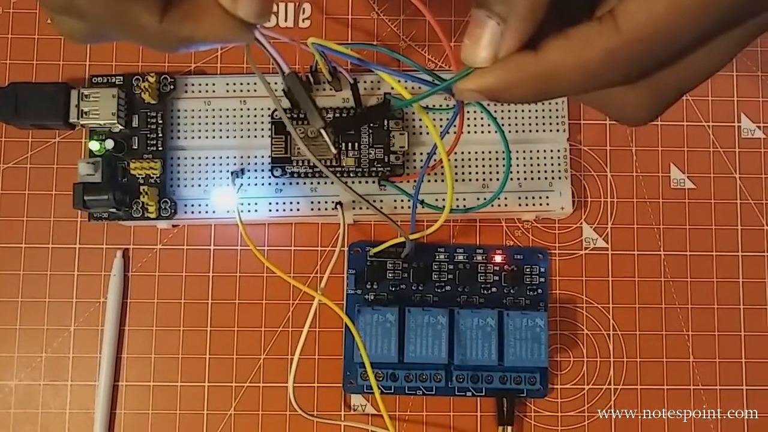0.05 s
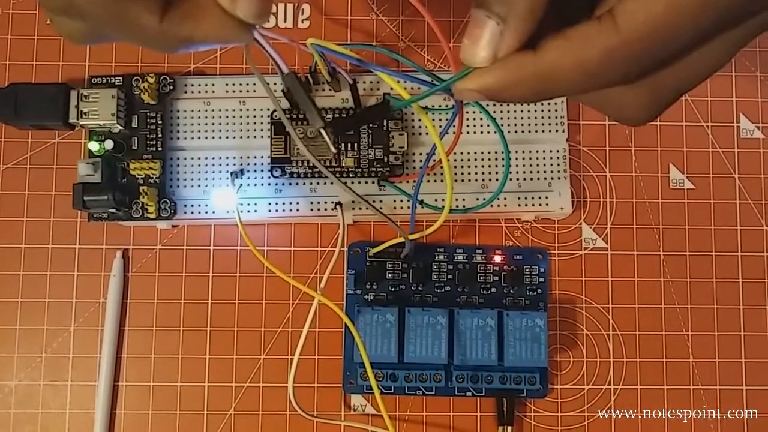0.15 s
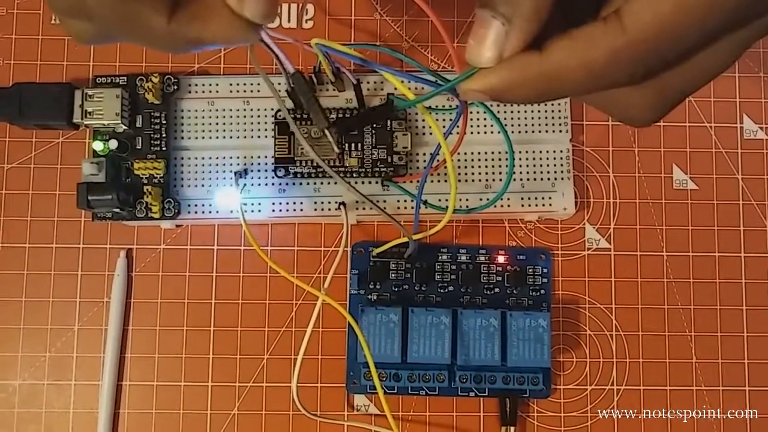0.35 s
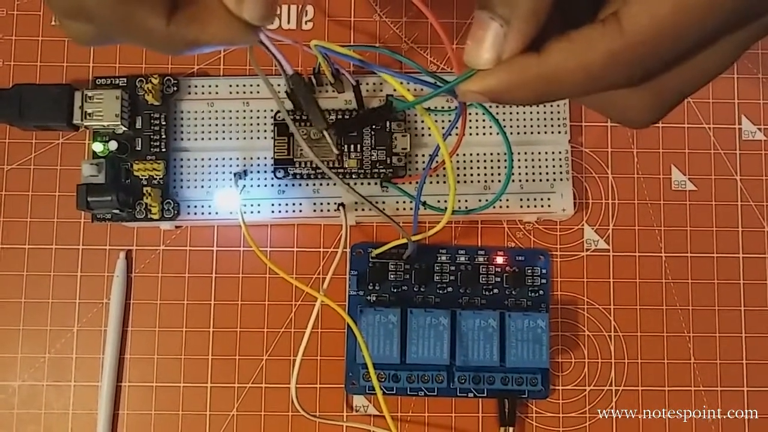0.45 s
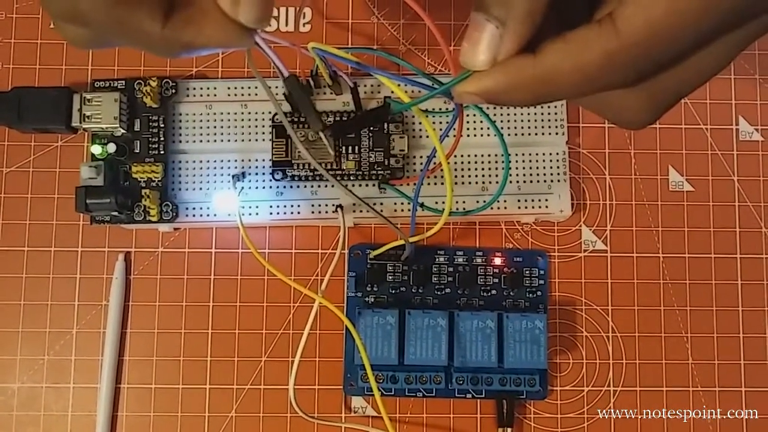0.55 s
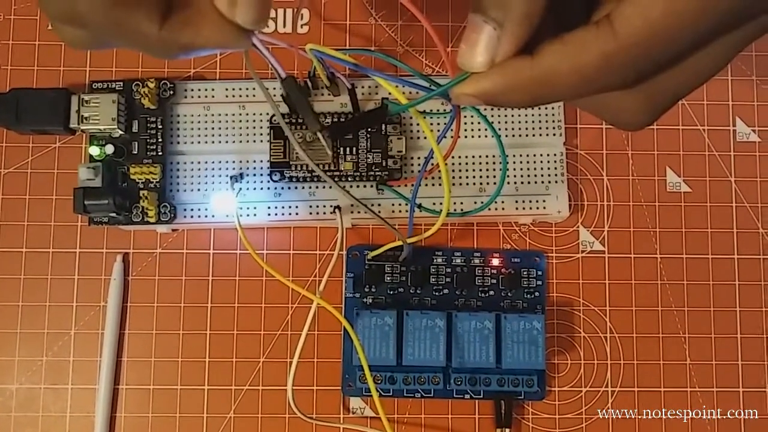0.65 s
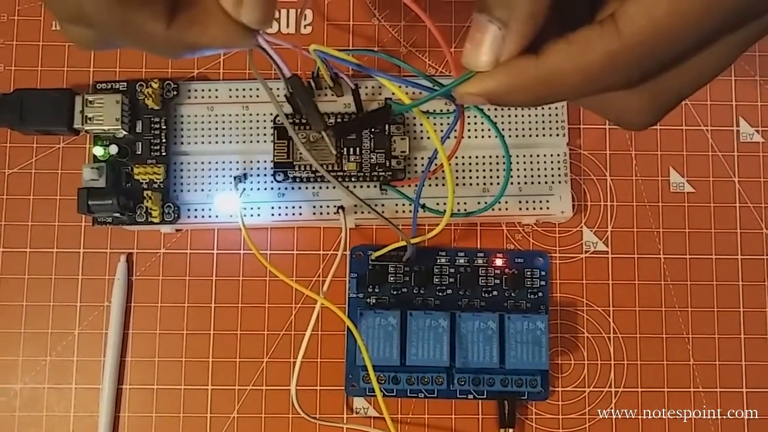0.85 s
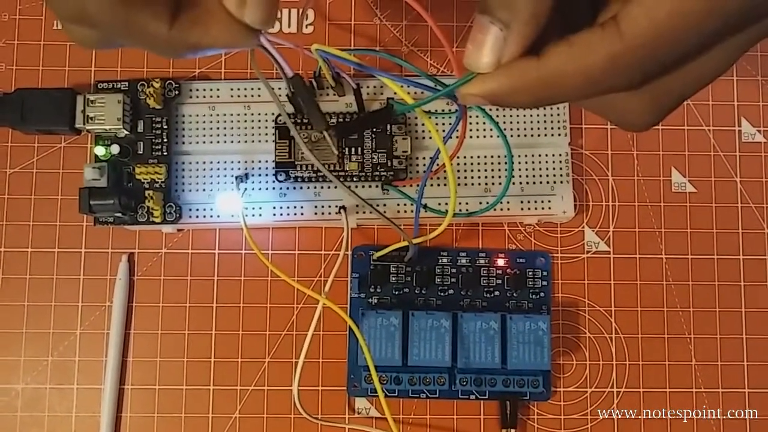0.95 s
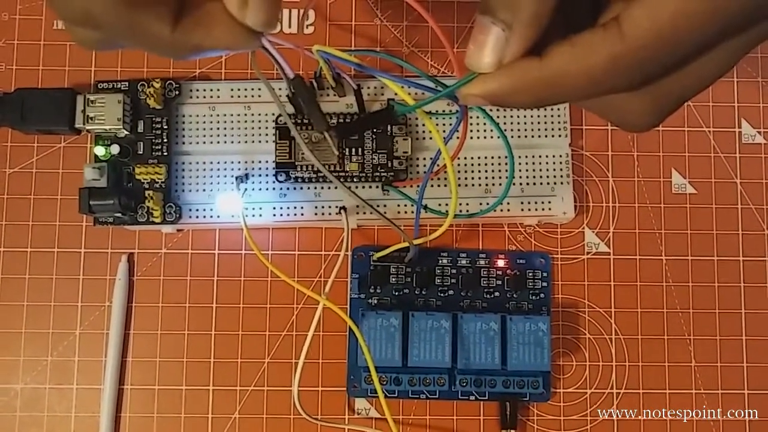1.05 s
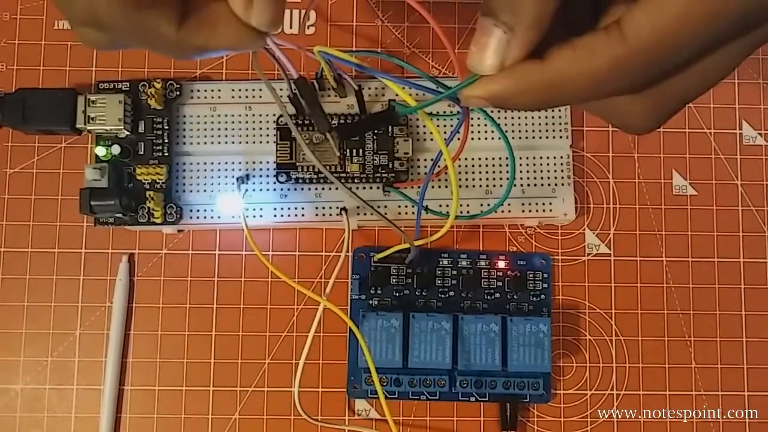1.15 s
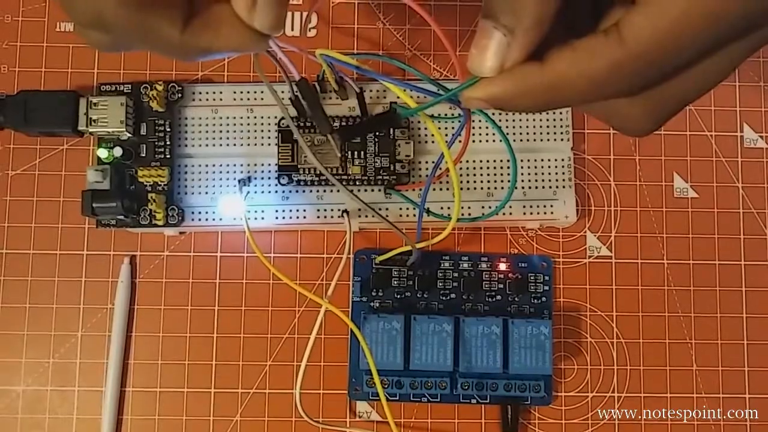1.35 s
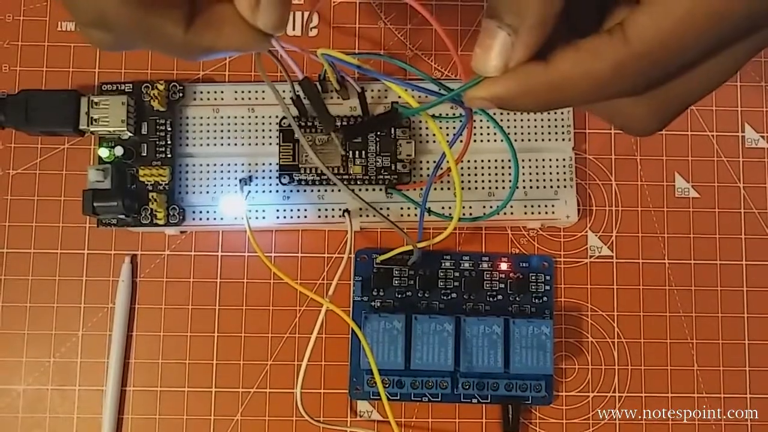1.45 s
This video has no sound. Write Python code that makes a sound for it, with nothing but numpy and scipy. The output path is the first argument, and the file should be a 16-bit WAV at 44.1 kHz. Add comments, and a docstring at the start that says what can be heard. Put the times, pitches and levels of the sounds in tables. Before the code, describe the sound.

A small relay snaps sharply, then chatters in a quick metallic double click, in a small room

```python
"""Chattering relay on a desk, small hard room

Near: a small relay snaps once, then chatters as its armature bounces and rattles before it seats. Blows ring
decaying modes of its metal parts, case and circuit board; filtered noise makes the cracks and the rattle. Amid
the blows the spring quivers, a pitch-jittered sine. Echoes and a dense tail place it in the room. Behind: faint
wavering hum, steady room noise and distant falling chirps, probably a bird (swept sines)."""
import sys
import numpy as np
from scipy import signal
from scipy.fft import rfft, irfft
from scipy.io import wavfile

SR = 44100
rng = np.random.default_rng(int(sys.argv[2]) if len(sys.argv) > 2 else 0)


def materialize(psi):
    """Save the field psi as 16-bit PCM at rate SR to the path in sys.argv[1].

    A 1-D psi becomes a single channel; in a 2-D psi each row is a channel.
    """
    bounded = np.clip(np.atleast_2d(psi).T, -1, 1)
    quanta = np.round(bounded * 32767).astype(np.int16)
    wavfile.write(sys.argv[1], SR, quanta)


N = 66150

# room noise, spectrum before scaling to rms 1: f/Hz, relative level/dB
NOISE_SPECTRUM = [(20, -46), (50, -15.5), (90, -2), (140, -2), (230, 4), (330, 1.5), (480, -3.5),
                  (1200, -7), (1900, -11.5), (3500, -13.5), (6200, -13.5), (8500, -21.5), (11000, -25.5),
                  (15000, -23.5)]
# room noise over time: t/s, level/dB
NOISE_LEVEL = [(0, -55), (.25, -55), (.5, -60), (.6, -56), (.75, -58.5), (1, -57.5), (1.35, -59),
               (1.5, -57.5)]
# hum over time: t/s, level/dB
HUM_SWELL = [(0, -70), (.37, -62.5), (.6, -69.5), (.8, -69.5), (1.02, -59), (1.2, -68), (1.5, -65)]
# distant chirps: t/s, length/s, start f/Hz, end f/Hz, level/dB, octave relative level/dB
CHIRPS = [(.0, 0.032, 4414, 2557, -48.5, -2.5), (0.082, 0.043, 4308, 2937, -51.5, -13),
          (0.308, 0.039, 4207, 2734, -51.5, -1.5), (0.52, 0.067, 4785, 4260, -58.5, -13),
          (0.546, .024, 4188, 2287, -48.5, -5.5), (0.809, 0.025, 4100, 2785, -55.5, -3.5),
          (0.894, 0.025, 4408, 2513, -48, -5.5), (1.08, .026, 4108, 2880, -55, -5.5),
          (1.169, 0.019, 4574, 2680, -49, -5.5), (1.377, 0.027, 4100, 2744, -53.5, -3),
          (1.444, 0.023, 4600, 2453, -49.5, -4.5)]
# tone colour of the chirps and their reverberation: f/Hz, gain/dB
CHIRP_COLOUR = [(2300, -3), (3200, -2), (4200, -0.5), (5000, -7), (5700, 1), (6600, 1), (7100, -8),
                (7800, -11), (9500, -10.5)]
# jolts of the circuit board: t/s, level/dB
BOARD_JOLTS = [(.2126, -32.5), (.2727, -33.5), (.2815, -34.5), (.2855, -40), (.2888, -38), (.2930, -43)]
# armature blows: t/s, then the level/dB of case, armature, yoke, spring and crack
BLOWS = [(0.2143, -12, -18, -21.5, -11.5, -26), (0.276, -24.5, -11.5, -26.5, -39, -38),
         (0.2774, -8.5, -7.5, -37, -19.5, -44), (0.2803, -21, -33, -26.5, -21.5, -60),
         (0.2924, -20, -28, -35, -32, -29), (0.2936, -9, -13, -22, -12, -26.5)]
# modes of the circuit board: f/Hz, relative level/dB
BOARD_MODES = [(930, -18), (1080, -1), (1220, -0.5), (2450, -8)]
# modes of the armature: f/Hz, relative level/dB
ARMATURE_MODES = [(6760, 1), (6980, -11)]
# modes of the case: f/Hz, relative level/dB
CASE_MODES = [(5520, -9), (5790, 2), (6110, 1.5), (11620, -18), (12520, -20), (13500, -23), (14300, -35)]
# modes of the metal yoke: f/Hz, relative level/dB
YOKE_MODES = [(7750, 0.5), (8090, 3.5), (8600, -11), (9600, -12.5)]
# modes of the contact spring: f/Hz, relative level/dB
SPRING_MODES = [(4130, -11.5), (4500, 3), (4730, 0.5)]
# crack of a blow, spectrum before scaling to rms 1: f/Hz, relative level/dB
CRACK_SPECTRUM = [(30, -37), (120, -38), (400, -16), (1200, -14), (1900, -26), (2600, -5), (3400, -17.5),
                  (4300, 8.5), (6500, 3), (8500, -4), (10300, -7), (12800, -9.5), (15000, -10.5)]
# fine rattle, spectrum before scaling to rms 1: f/Hz, relative level/dB
RATTLE_SPECTRUM = [(40, -12.5), (100, -7), (300, -0.5), (600, -7.5), (1150, 3), (1700, -9), (2700, -3.5),
                   (3400, -5), (4500, 3), (6500, 0.5), (8200, 1), (9800, -17), (12000, -3.5), (13600, -10),
                   (15000, -24)]
# quivers of the contact spring: t/s, length/s, f/Hz, level/dB
SPRING_QUIVERS = [(0.2743, 0.0049, 4610, -26.5), (.2820, .0050, 4510, -23), (0.2858, 0.0068, 4410, -20.5)]
# early reflections of the relay: delay t/s, level/dB
ECHOES = [(.00105, -18.5), (0.012, -29), (0.0142, -19), (0.0152, -27), (0.021, -25)]
# reverberation time of the room, 60 dB decay: f/Hz, T60/s
ROOM_T60 = [(200, 1), (1300, 0.48), (3500, 0.55), (6000, 0.4), (9000, 0.39), (15000, 0.3)]
# tone colour of the room's tail: f/Hz, gain/dB
ROOM_COLOUR = [(60, 2), (140, 3.5), (230, 14), (500, 6), (1200, 3), (2000, -3), (3300, 2.5), (3900, -1),
               (4480, -5), (5100, -7), (5800, -6), (6700, 1.5), (8050, 1), (8500, -2), (9100, -8),
               (10300, 2), (14000, -9)]
# dips in the sound that the relay radiates: f/Hz, width/Hz, gain/dB
RELAY_DIPS = [(5100, 190, -6), (6430, 90, -2)]
# notch in the microphone's response: f/Hz, width/Hz, gain/dB
MIC_NOTCH = [(7286, 174, -16.5)]

HUM_HZ, HUM_WAVER_RAD, WAVER_RATE_HZ = 296.1, 0.23, 7.5  # the waver is an rms phase swing
CHIRP_BEND, CHIRP_EDGE = 1.1, 0.14  # exponents of the pitch fall and of the swell
CHIRP_RASP_HZ, CHIRP_RASP_RATE_HZ = 259, 750
CHIRP_T60_S, CHIRP_BUILD_S, CHIRP_DIRECT_DB = 0.72, 0.0045, -0.5
DETUNE = 0.0078  # rms fraction of a mode's pitch
BOARD_RISE_S, BOARD_T60_S = 0.001, 0.012
METAL_RISE_S, CASE_T60_S, YOKE_T60_S = 0.00055, 0.007, 0.014  # the armature decays like the case
SPRING_RISE_S, SPRING_T60_S = 0.001, 0.0084
CRACK_T60_S = 0.018
RATTLE_FULL_S, RATTLE_END_S, RATTLE_DB = 0.28, 0.294, -35.5  # full level between these times
RATTLE_RISE_DB_PER_S, RATTLE_FALL_DB_PER_S = 560, 3000
QUIVER_JITTER_HZ, QUIVER_RATE_HZ = 110, 1200
ROOM_DB, ROOM_BUILD_S = -13.5, 0.016
ROOM_CRACK_DB = 13  # the crack spreads into the room more than the ringing does
EDGE_HZ = 15150


def amp(db):
    """Decibels to gain."""
    return 10 ** (np.asarray(db) / 20)


def evened(x):
    """Scales to rms 1."""
    return x / np.sqrt(np.mean(x ** 2) + 1e-20)


def read(points, hz):
    """Reads a table along a log-frequency axis."""
    f, value = np.transpose(points)
    return np.interp(np.log(hz + 1), np.log(f + 1), value)


def coloured(x, points):
    """Filters by a table of f/Hz, gain/dB."""
    size = 2 * len(x)
    gain = amp(read(points, np.fft.rfftfreq(size, 1 / SR)))
    return irfft(rfft(x, size) * gain, size)[:len(x)]


def notched(x, dips):
    """Cuts narrow dips (f/Hz, width/Hz, gain/dB) out of a sound."""
    hz = np.fft.rfftfreq(2 * N, 1 / SR)
    cut_db = sum(db * np.exp(-((hz - centre) / width) ** 2) for centre, width, db in dips)
    return irfft(rfft(x, 2 * N) * amp(cut_db))[..., :N]


def add(mix, s, sound):
    """Mixes a sound in at a time in seconds."""
    part = mix[max(round(s * SR), 0):][:len(sound)]
    part += sound[:len(part)]


def drift(rate_hz, size=N):
    """Random motion of rms 1, mostly slower than a rate."""
    hz = np.fft.rfftfreq(size, 1 / SR)
    slow = (hz > 0) / (1 + (hz / rate_hz) ** 4)
    return evened(irfft(rfft(rng.standard_normal(size)) * slow, size))


def tail(t60, build_s):
    """Dense reflections that build up while each band dies at its own speed; energy 1."""
    hz, t, bands = signal.stft(rng.choice([-1., 1.], SR), SR, nperseg=256)
    decay = amp(-60 * t / read(t60, hz)[:, None])
    out = signal.istft(bands * decay, SR)[1]
    out = out * (1 - np.exp(-(np.arange(len(out)) / SR / build_s) ** 2))
    return out / np.linalg.norm(out)


def fade(t60, t):
    """Exponential decay by 60 dB in t60 seconds."""
    return np.exp(-np.log(1000) * t / t60)


def ring(modes, rise_s, t60, t):
    """Modes of a struck part that swell and die together, slightly detuned at each strike."""
    out = np.zeros(len(t))
    for hz, db in modes:
        detuned_hz = hz * (1 + DETUNE * rng.standard_normal())
        out += amp(db) * np.sin(2 * np.pi * detuned_hz * t)
    return out * (1 - np.exp(-t / rise_s)) * fade(t60, t)


def background():
    """Soft, steady room noise and a hum whose phase wavers while its level swells."""
    t = np.arange(N) / SR
    noise = evened(coloured(rng.standard_normal(N), NOISE_SPECTRUM))
    waver = HUM_WAVER_RAD * drift(WAVER_RATE_HZ)
    hum = evened(np.sin(2 * np.pi * HUM_HZ * t + waver))
    noise_db = np.interp(t, *np.transpose(NOISE_LEVEL))
    hum_db = np.interp(t, *np.transpose(HUM_SWELL))
    return amp(noise_db) * noise + amp(hum_db) * hum


def bird():
    """Distant, slightly raspy falling whistles with their octave, heard mostly as reverberation."""
    out = np.zeros(N)
    for s, length, start_hz, end_hz, db, octave_db in CHIRPS:
        u = np.arange(0, length, 1 / SR) / length  # 0 to 1 along the chirp
        rasp = CHIRP_RASP_HZ * drift(CHIRP_RASP_RATE_HZ, size=4096)[:len(u)]
        hz = start_hz + (end_hz - start_hz) * u ** CHIRP_BEND + rasp
        phase = 2 * np.pi * np.cumsum(hz) / SR
        whistle = np.sin(phase) + amp(octave_db) * np.sin(2 * phase)
        call = amp(db) * abs(np.sin(np.pi * u)) ** CHIRP_EDGE * whistle
        add(out, s, amp(CHIRP_DIRECT_DB) * call)
        add(out, s, 2 * signal.fftconvolve(call, tail([(1, CHIRP_T60_S)], CHIRP_BUILD_S)))
    return coloured(out, CHIRP_COLOUR)


def board():
    """The moving armature jolts the circuit board, which rings low and briefly."""
    out, t = np.zeros(N), np.arange(SR // 20) / SR
    for s, db in BOARD_JOLTS:
        add(out, s, amp(db) * ring(BOARD_MODES, BOARD_RISE_S, BOARD_T60_S, t))
    return out


def relay():
    """Each blow cracks and rings armature, case, yoke and spring; gives the ringing and the cracks."""
    rings, cracks, t = np.zeros(N), np.zeros(N), np.arange(SR // 20) / SR
    for s, case_db, armature_db, yoke_db, spring_db, crack_db in BLOWS:
        add(rings, s, amp(armature_db) * ring(ARMATURE_MODES, METAL_RISE_S, CASE_T60_S, t))
        add(rings, s, amp(case_db) * ring(CASE_MODES, METAL_RISE_S, CASE_T60_S, t))
        add(rings, s, amp(yoke_db) * ring(YOKE_MODES, METAL_RISE_S, YOKE_T60_S, t))
        add(rings, s, amp(spring_db) * ring(SPRING_MODES, SPRING_RISE_S, SPRING_T60_S, t))
        burst = evened(coloured(rng.standard_normal(len(t)), CRACK_SPECTRUM))
        add(cracks, s, amp(crack_db) * burst * fade(CRACK_T60_S, t))
    return rings, cracks


def chatter():
    """The half-held armature rattles finely until it seats; its spring quivers in short swells."""
    t = np.arange(N) / SR
    below_db = RATTLE_RISE_DB_PER_S * np.maximum(RATTLE_FULL_S - t, 0)
    below_db += RATTLE_FALL_DB_PER_S * np.maximum(t - RATTLE_END_S, 0)
    rattle = evened(coloured(rng.standard_normal(N), RATTLE_SPECTRUM))
    out = amp(RATTLE_DB - below_db) * rattle
    for s, length, hz, db in SPRING_QUIVERS:
        u = np.arange(0, length, 1 / SR) / length
        pitch = hz + QUIVER_JITTER_HZ * drift(QUIVER_RATE_HZ, size=4096)[:len(u)]
        tone = np.sin(2 * np.pi * np.cumsum(pitch) / SR)
        add(out, s, amp(db) * np.sin(np.pi * u) * tone)
    return out


def room(rings, cracks):
    """Desk and walls throw the relay's sound back, then the room rings on."""
    direct = rings + cracks
    spread = rings + amp(ROOM_CRACK_DB) * cracks
    reverb = coloured(tail(ROOM_T60, ROOM_BUILD_S), ROOM_COLOUR)
    out = direct + amp(ROOM_DB) * signal.fftconvolve(spread, reverb)[:N]
    for delay_s, db in ECHOES:
        add(out, delay_s, amp(db) * direct)
    return out


def scene():
    """The relay in its room, over the background and the distant bird."""
    rings, cracks = relay()
    clicks = notched(room(rings + chatter() + board(), cracks), RELAY_DIPS)
    return (clicks + bird() + background())[None]


def record(dry):
    """A narrow notch in the microphone's response, then a low-pass band limit."""
    heard = notched(dry, MIC_NOTCH)
    lowpass = signal.firwin(301, EDGE_HZ, window=("kaiser", 9), fs=SR)
    return signal.oaconvolve(heard, lowpass[None], "same")


dry = scene()
out = record(dry)
materialize(out)
```